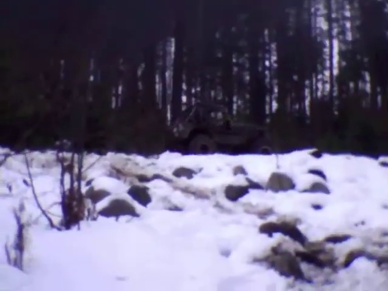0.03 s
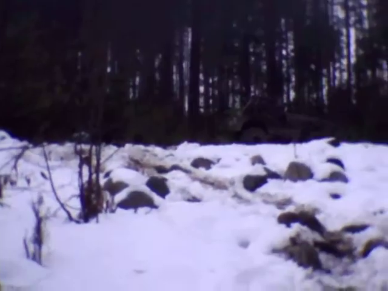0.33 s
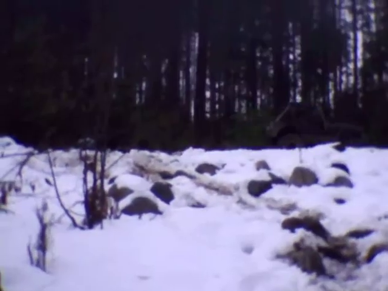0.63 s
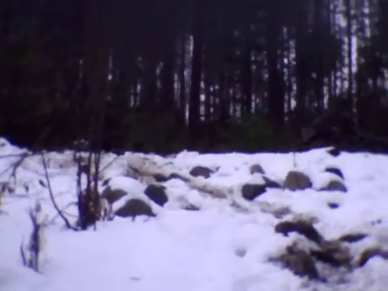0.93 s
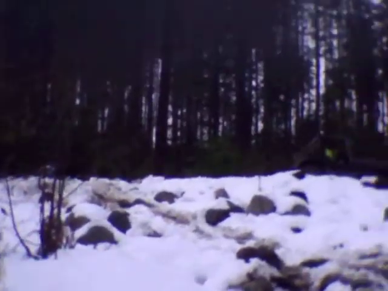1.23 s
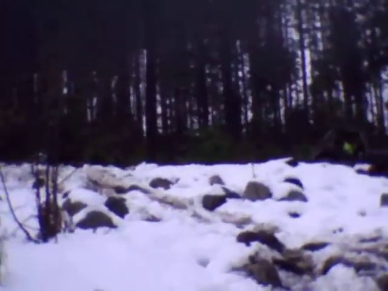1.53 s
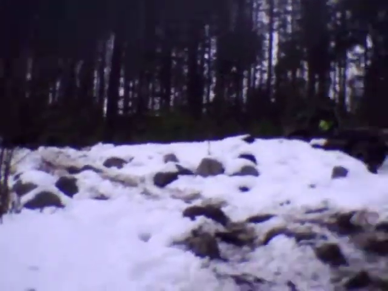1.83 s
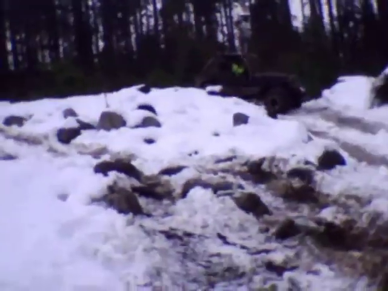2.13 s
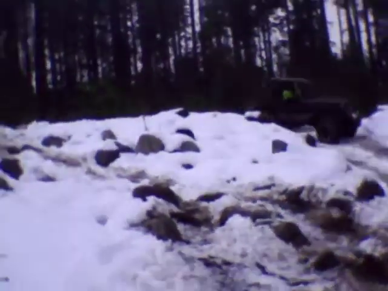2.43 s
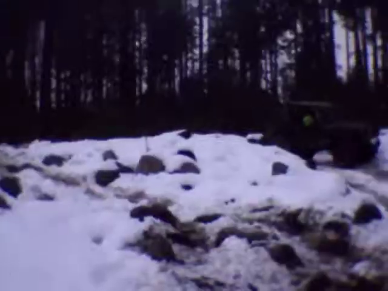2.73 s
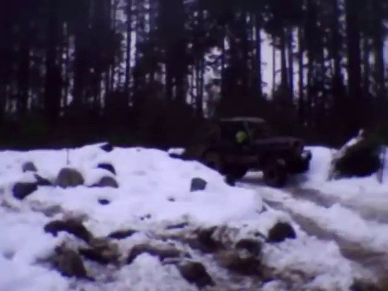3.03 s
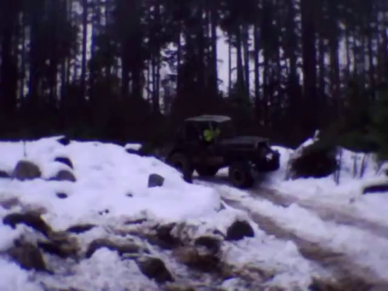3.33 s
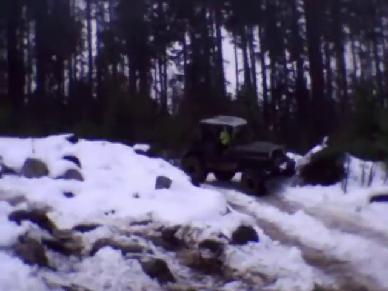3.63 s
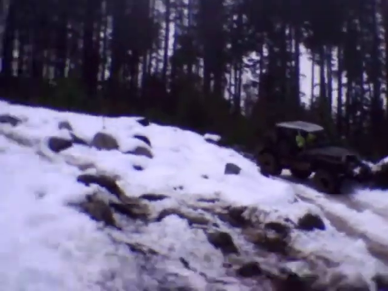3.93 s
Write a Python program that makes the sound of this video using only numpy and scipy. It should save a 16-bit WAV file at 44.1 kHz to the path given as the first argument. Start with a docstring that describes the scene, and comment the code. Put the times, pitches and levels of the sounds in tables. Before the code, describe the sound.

A slipping belt squeals in rapid chirps on an off-road vehicle, just after a short exhaust rasp. A steady whine and churning engine and tyres continue, ending with body knocks, heard from some distance on a snowy forest track.

```python
"""A slipping belt squeals on an off-road vehicle, breaking into about ten chirps a second.
Just before that, a dab of throttle makes the exhaust rasp, one puff of gas for each engine firing.
The vehicle crawls over a snowy forest track, some way from a small camera. A pump whines
throughout over the churn of engine and tyres, and the body knocks as it comes nearer."""
import sys
import numpy as np
from scipy import signal
from scipy.fft import rfft, irfft
from scipy.io import wavfile

SR = 44100
rng = np.random.default_rng(int(sys.argv[2]) if len(sys.argv) > 2 else 0)


def digitize_waveform(pressure):
    """Quantize a signal to 16-bit integers and store it at the path in sys.argv[1].

    Rows of a 2-D input are taken as channels; values are limited to [-1, 1].
    """
    field = np.atleast_2d(pressure).T
    bounded = np.clip(field, -1, 1)
    quanta = np.round(bounded * 32767).astype(np.int16)
    wavfile.write(sys.argv[1], SR, quanta)


N = 176400  # 4 seconds


def amp(db):
    """Turns decibels into a number to multiply by."""
    return 10 ** (np.asarray(db) / 20)


def unit(x):
    """Scales a sound to an average strength (rms) of 1."""
    return x / np.sqrt(np.mean(x ** 2) + 1e-20)


def curve(rows, column=1):
    """Joins a table's points with straight lines, giving one value per sample."""
    rows = np.array(rows)
    return np.interp(np.arange(N) / SR, rows[:, 0], rows[:, column])


def add(mix, start_s, sound):
    """Mixes a sound in at a given time."""
    part = mix[max(round(start_s * SR), 0):][:len(sound)]
    part += sound[:len(part)]


def noise(gain, size=N):
    """Noise whose strength at each frequency f follows gain(f)."""
    f = np.fft.rfftfreq(N, 1 / SR) + 1
    spectrum = rfft(rng.standard_normal(N)) * gain(f)
    return unit(irfft(spectrum, N))[:size]


def colour(points):
    """Turns rows of f/Hz, level/dB into a gain for noise()."""
    hz, db = np.transpose(points)
    return lambda f: amp(np.interp(np.log(f), np.log(hz + 1), db))


def wander(hz):
    """A smooth random wobble, up to about hz times a second."""
    return noise(lambda f: 1 / (1 + (f / hz) ** 4))


def band(hz, width_hz, size=N):
    """Noise gathered around one pitch."""
    return noise(lambda f: 1 / (1 + (2 * (f - hz) / width_hz) ** 2), size)


def low_pass(x, hz, size):
    """Cuts the treble above hz; a larger size cuts more steeply."""
    taps = signal.firwin(size, hz, window=("kaiser", 7), fs=SR)
    return signal.oaconvolve(x, taps[None], "same")


def churn(low_hz=900, high_hz=3000, grain_db=0.94):
    """Engine clatter and tyres in slush: three bands of grainy noise over a low rumble."""
    # tone colour of the churn: f/Hz, level/dB
    churn_colour = [(120, -58.5), (200, -22), (272, -24), (453, -20.5), (802, -16.5), (908, -12),
                    (1220, -14.5), (1400, -11.5), (1710, -10), (1850, -6.5), (2030, -11), (2260, -9),
                    (2550, -18.5), (2800, -12.5), (8000, -18.5), (10400, -23.5), (17600, -120)]
    # band levels before the trims: t/s, low/dB, middle/dB, treble/dB
    levels = [(0.62, -33.5, -39.5, -40), (0.86, -36, -39.5, -37), (1.12, -42, -45.5, -42.5),
              (1.42, -40, -46, -38.5), (1.87, -41.5, -44.5, -42), (2.2, -38.5, -41, -39.5),
              (2.51, -39, -41, -42), (3.01, -40.5, -40, -40), (3.31, -38.5, -40, -40),
              (3.84, -40.5, -38.5, -39), (4.0, -27, -35, -37.5)]
    # trim added to each band: low/dB, middle/dB, treble/dB
    trims = [-2.5, 6.5, -2.5]
    # tone colour of the rumble: f/Hz, level/dB
    rumble_colour = [(25, -12.5), (45, -7), (70, -6.5), (100, -5), (140, -1.5), (185, -7), (230, -18),
                     (320, -27), (600, -59.5), (1500, -110)]
    # loudness of the rumble: t/s, level/dB
    rumble_level = [(0, -38.5), (.7, -46.5), (1.1, -49.5), (1.87, -55), (1.92, -39.5), (2.08, -40.5),
                    (2.2, -49.5), (3.65, -50), (3.74, -40), (4, -25.5)]
    shape = colour(churn_colour)
    below = lambda f, hz: 1 / (1 + (f / hz) ** 8)
    shares = [lambda f: below(f, low_hz),
              lambda f: (1 - below(f, low_hz)) * below(f, high_hz),
              lambda f: 1 - below(f, high_hz)]
    wash = np.zeros(N)
    for k, share in enumerate(shares):
        hiss = noise(lambda f: shape(f) * np.sqrt(share(f)))
        wash += amp(curve(levels, column=k + 1) + trims[k]) * hiss
    grain = amp(grain_db * wander(hz=120))
    rumble = amp(curve(rumble_level)) * noise(colour(rumble_colour))
    return wash * grain + rumble


def pump(waver=0.0013, shimmer_db=0.64, fading_db=6.0):
    """A pump whines in harmonics (multiples of one pitch) that fade in and out as the vehicle turns."""
    # pitch of the fourth harmonic, the strongest: t/s, f/Hz
    fourth_pitch = [(0, 1838), (.7, 1840), (1.05, 1856), (1.35, 1839), (1.6, 1822), (1.88, 1812),
                    (2.1, 1816), (2.35, 1834), (2.7, 1834), (3.3, 1829), (3.55, 1806), (3.75, 1803),
                    (4, 1808)]
    # its loudness: t/s, level/dB
    fourth_level = [(0.8, -40.5), (0.91, -34.5), (1.31, -38), (1.36, -30.5), (1.47, -28), (1.78, -46),
                    (2.06, -29), (2.84, -31.5), (3.14, -28), (3.4, -34.5), (3.43, -30), (4.0, -31)]
    # loudness of the second harmonic: t/s, level/dB
    second_level = [(0, -42.5), (1, -48.5), (1.7, -50.5), (2.1, -39.5), (2.85, -34.5), (3.4, -37.5),
                    (3.7, -48.5), (4, -56)]
    # faint harmonics, before their random fading: multiple, level/dB
    faint_harmonics = [(1, -54), (3, -59), (5, -49), (6, -51.5)]
    base_hz = curve(fourth_pitch) / 4 * (1 + waver * wander(hz=37))
    angle = 2 * np.pi * np.cumsum(base_hz) / SR
    fourth = amp(curve(fourth_level)) * np.sin(4 * angle)
    second = amp(curve(second_level)) * np.sin(2 * angle)
    faint = sum(amp(db + fading_db * wander(hz=2.56)) * np.sin(k * angle) for k, db in faint_harmonics)
    shimmer = amp(shimmer_db * wander(hz=30.2))
    return np.sqrt(2) * ((fourth + second) * shimmer + faint)


def squeaks(tone_over_hiss_db=3.5):
    """Belt and chassis squeak and groan over the ruts: each a wobbly tone in a narrow hiss."""
    # squeaks: t/s, length/s, level/dB, f/Hz, width/Hz
    events = [(0.587, 0.053, -27.5, 1155, 130), (.666, 0.092, -28.5, 1184, 129),
              (0.811, 0.076, -31, 2220, 350), (0.818, 0.077, -36.5, 5000, 600),
              (2.048, 0.15, -35.5, 1182, 189), (3.552, 0.023, -20.5, 2180, 280),
              (3.701, 0.22, -42, 3515, 39.5)]
    out = np.zeros(N)
    for start, length, db, hz, width in events:
        size = round(length * SR)
        pitch = hz + width / 2 * wander(hz=width)[:size]
        tone = amp(tone_over_hiss_db) * unit(np.sin(2 * np.pi * np.cumsum(pitch) / SR))
        swell = np.sqrt(np.hanning(size))
        add(out, start, amp(db) * swell * unit(tone + band(hz, width, size)))
    return out


def knocks(clack_at_s=3.9218, clack_db=-9.5, clack_hz=830, clack_width_s=0.0008):
    """The body knocks over the ruts: quickly dying bursts of noise and one hollow clack."""
    # knocks: t/s, level/dB, f/Hz, width/Hz, decay/s
    events = [(1.673, -27.5, 1350, 1790, 0.0056), (1.97, -21, 3420, 3000, 0.003),
              (2.206, -30, 525.5, 380, 0.01), (3.915, -24, 2226, 2500, 0.0041),
              (3.949, -18.5, 2863, 2470, 0.003), (3.979, -19, 2390, 3420, 0.0046)]
    out = np.zeros(N)
    t = np.arange(SR // 20) / SR
    for start, db, hz, width, decay in events:
        fade = np.exp(-t / decay)
        burst = unit(fade * band(hz, width, len(t)))
        add(out, start, amp(db) * np.sqrt(np.mean(fade ** 2)) * burst)
    since = np.arange(N) / SR - clack_at_s
    clack = np.exp(-(since / clack_width_s) ** 2) * np.sin(2 * np.pi * clack_hz * since)
    return out + amp(clack_db) * clack


def exhaust(puff_at=0.11, half_width=0.2, shrink=0.12, between_puffs=0.32, pipe_db=-1):
    """Each engine firing lets out a puff of rasping gas that rings the pipe, over a low drone."""
    # engine speed, as firings a second: t/s, f/Hz
    firing_rate = [(0, 42.5), (.12, 47.3), (.2, 48.2), (.33, 43.8), (.38, 44.6), (.46, 50.5), (.55, 54.5),
                   (.62, 51), (.9, 36), (4, 36)]
    # loudness of the rasp: t/s, level/dB
    rasp_level = [(0, -21), (.12, -20.5), (.225, -22), (.28, -34.5), (.34, -34), (.44, -21.5), (.5, -26.5),
                  (.58, -30), (.66, -75), (.9, -86)]
    # tone colour of the rushing gas: f/Hz, level/dB
    gas_colour = [(150, -36.5), (250, -18), (480, -22.5), (670, -6.5), (775, -18), (949, -10.5),
                  (1530, -15.5), (1800, -3.5), (2230, -11.5), (2980, -12.5), (4350, -25), (5250, -22),
                  (8000, -34), (10400, -64), (17600, -120)]
    # loudness of the drone: t/s, level/dB
    drone_level = [(0, -32), (.2, -26.5), (.31, -33.5), (.48, -28), (.56, -28.5), (.63, -46.5), (.8, -43),
                   (1, -55), (1.3, -60)]
    # tones in the drone: multiple of the firing rate, relative level/dB
    drone_tones = [(2, -7.5), (3, 1.5), (4, -8.5), (5, -27), (6, -31.5)]
    # throb at the firing rate itself, which outlasts the throttle: t/s, level/dB
    throb_level = [(0, -28), (.3, -48), (.75, -39.5), (1.05, -53), (1.4, -72)]
    cycles = np.cumsum(curve(firing_rate)) / SR
    from_puff = (cycles - puff_at + 0.5) % 1 - 0.5  # in cycles, as are puff_at and half_width
    rasp_db = curve(rasp_level)
    width = half_width * amp(shrink * (rasp_db - rasp_db.max()))  # a weaker puff is shorter
    puffs = between_puffs + np.exp(-(from_puff / width) ** 4)
    puffs /= np.sqrt(2 * width + between_puffs ** 2)  # width barely changes the loudness
    gas = noise(colour(gas_colour)) + amp(pipe_db) * band(hz=1880, width_hz=350)
    drone = unit(sum(amp(db) * np.sin(2 * np.pi * (k * cycles + rng.random())) for k, db in drone_tones))
    throb = unit(np.sin(2 * np.pi * cycles))
    return amp(rasp_db) * puffs * gas + amp(curve(drone_level)) * drone + amp(curve(throb_level)) * throb


def belt(rise=0.017, jitter_share=0.015, flutter_db=2.5, rough_hz=216, edge_s=0.011, scrape_db=-14):
    """The belt sticks and slips: each chirp sags in pitch and rises; a rough one smears into hiss."""
    # chirps: t/s, length/s, level/dB, midway f/Hz, relative octave level/dB,
    # midway dip of the main tone/dB, upward bend at both ends (share of the pitch)
    chirps = [(0.781, 0.091, -29, 2700, -12, 2, 0.041), (.867, 0.073, -25, 2694, -8, 1, 0.014),
              (.925, 0.079, -23, 2727, -10, 4.5, 0.023), (1, .085, -30, 2755, -4, -1.5, 0.0228),
              (1.065, 0.084, -28, 2800, -8.5, 3, 0.035), (1.146, 0.079, -27.5, 2684, -6.5, 4.5, 0.083),
              (1.223, 0.097, -30.5, 2845, -7.5, -2.5, 0.039), (1.313, 0.065, -28, 2760, -9.5, -7.5, 0.049),
              (1.383, 0.065, -25.5, 2855, -15, 0, 0.059), (1.467, 0.071, -27, 2757, -10.5, -6, 0.11),
              (1.556, 0.058, -25, 2887, -12, 0.5, 0.038), (1.664, 0.048, -23.5, 2856, -8, 1, 0.033),
              (1.763, 0.063, -24.5, 2794, -10.5, 3, 0.029), (1.869, 0.069, -20, 2800, -11, 6.5, 0.021),
              (1.956, 0.072, -20.5, 2724, -9, 10.5, 0.043), (2.018, 0.094, -21.5, 2786, -8, 0, 0.034),
              (2.112, 0.11, -23.5, 2678, -8, -0.5, 0.16), (2.217, 0.044, -17.5, 2703, -5.5, 4.5, 0.052),
              (2.288, .066, -22.5, 2770, -7.5, -3.5, .06), (2.352, 0.03, -26.5, 3110, -17, 4, 0.015),
              (2.378, 0.077, -20.5, 2815, -10, 7, 0.049), (2.487, 0.058, -13.5, 2805, -13.5, 23, 0.067),
              (2.593, 0.055, -20, 2773, -5, 13, 0.055), (2.695, 0.046, -16, 2840, -11, 5, 0.053)]
    # the squeal starts hoarse and cleans up: t/s, roughness (0 to 1)
    roughness = [(.78, 0.82), (1.5, 0.24), (1.9, 0.14), (2.05, 0.44), (2.18, 0.22), (2.7, 0.22)]
    out = np.zeros(N)
    jitter = jitter_share * wander(hz=143)
    flutter = {k: amp(flutter_db * wander(hz=113)) for k in (1, 2)}
    # a two-part (complex) wobble shakes both strength and phase, blurring a tone
    smear = {k: (wander(rough_hz * k) + 1j * wander(rough_hz * k)) / np.sqrt(2) for k in (1, 2)}
    scrape = amp(scrape_db) * rng.standard_normal(N)
    for start, length, db, hz, octave_db, dip_db, bend in chirps:
        t = np.arange(0, length, 1 / SR)
        at = round(start * SR) + np.arange(len(t))
        place = 2 * t / length - 1  # -1 at the start, +1 at the end
        pitch = hz * (1 + bend * place ** 2 + rise * place + jitter[at])
        angle = 2 * np.pi * np.cumsum(pitch) / SR
        rough = curve(roughness)[at[0]]
        harmonics = []
        for k in (1, 2):
            clean = (1 - rough) ** k
            wobble = np.sqrt(clean) * flutter[k][at] + np.sqrt(1 - clean) * smear[k][at]
            harmonics.append(unit((wobble * np.exp(1j * k * angle)).real))
        tone, octave = harmonics
        fade = np.clip(np.minimum(t, length - t) / edge_s, 0, 1)
        dip = amp(-dip_db * np.exp(-(place / 0.25) ** 2))
        add(out, start, amp(db) * fade * (dip * tone + amp(octave_db) * octave + scrape[at]))
    return out


def forest(x, echo_db=-8, fade_s=0.21):
    """Ground and trunks scatter short echoes, which fall by 60 dB in fade_s."""
    t = np.arange(SR // 2) / SR
    echoes = rng.standard_normal(len(t)) * (rng.random(len(t)) < 1 / 20)
    echoes *= np.exp(-np.log(1000) * t / fade_s)
    return amp(echo_db) * signal.fftconvolve(x, echoes / np.linalg.norm(echoes))[:N]


def scene():
    """All sources meet at one microphone; only the belt's chirps echo."""
    squeal = belt()
    mix = exhaust() + pump() + squeal + forest(squeal) + churn() + squeaks() + knocks()
    return mix[None]


def record(dry, offset=-0.401, limit=0.7):
    """The camera misses the high treble; its signal sits off-centre, so loud peaks clip on one side."""
    heard = low_pass(dry, hz=8200, size=151)
    clipped = np.clip(heard, -limit - offset, limit - offset)
    return low_pass(clipped, hz=15900, size=301) + offset


dry = scene()
out = record(dry)
digitize_waveform(out)
```